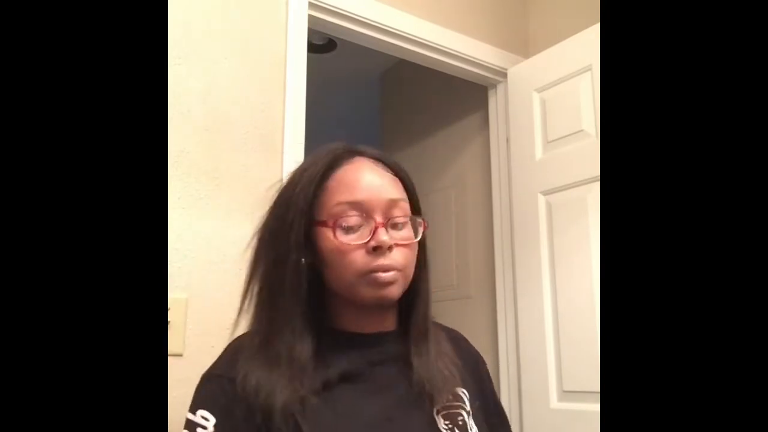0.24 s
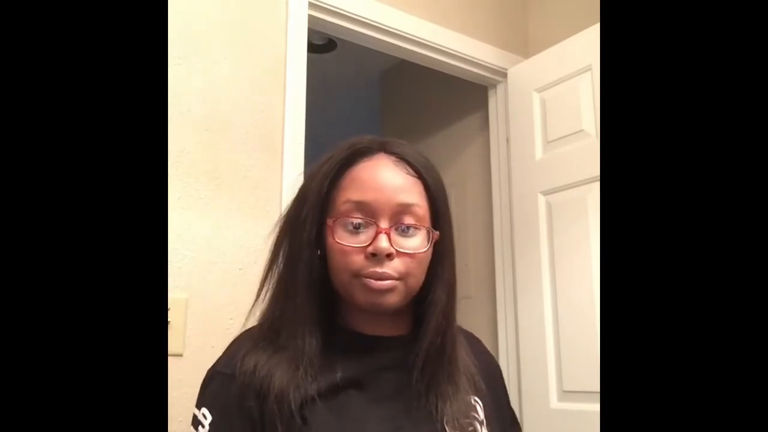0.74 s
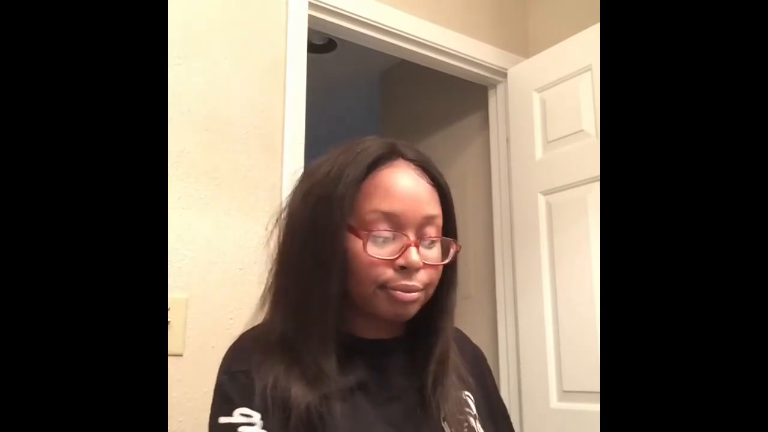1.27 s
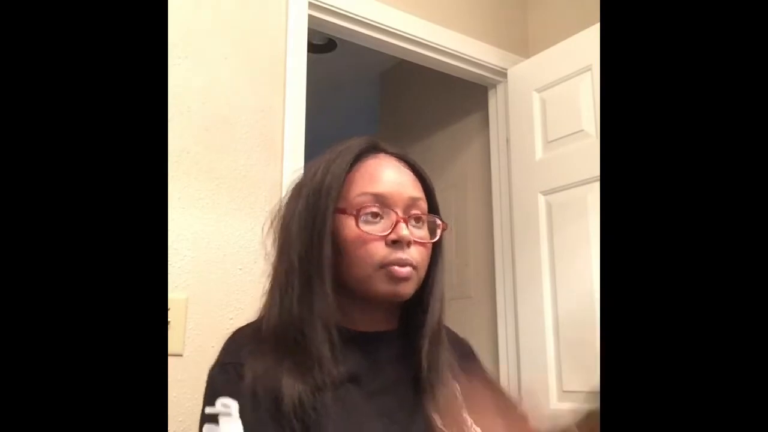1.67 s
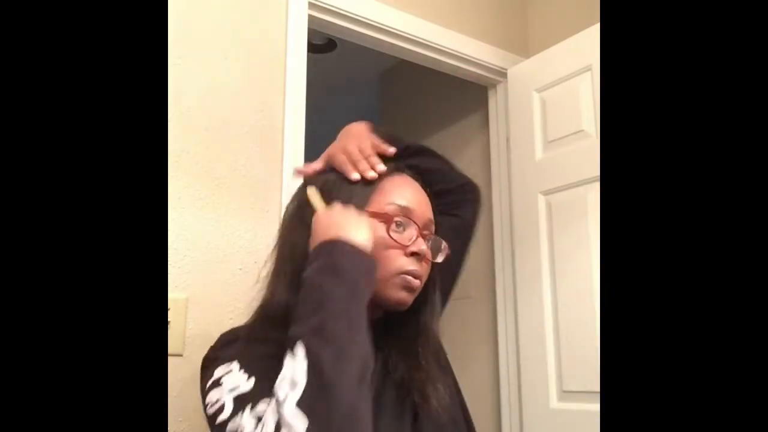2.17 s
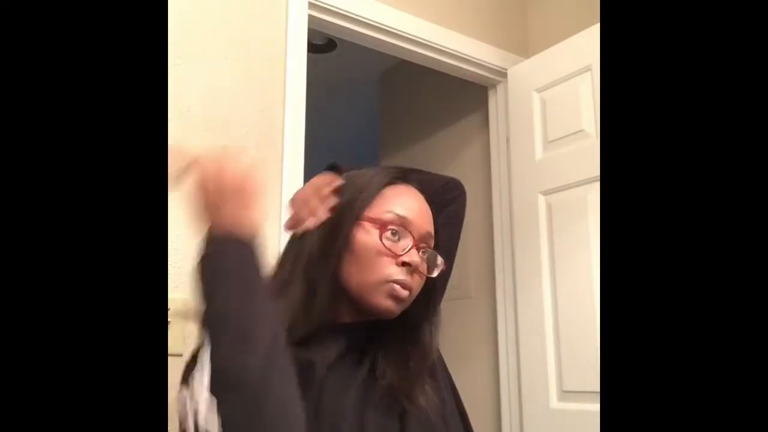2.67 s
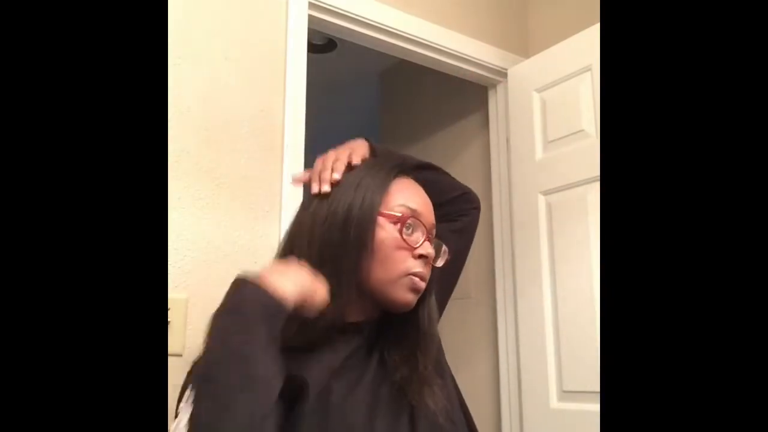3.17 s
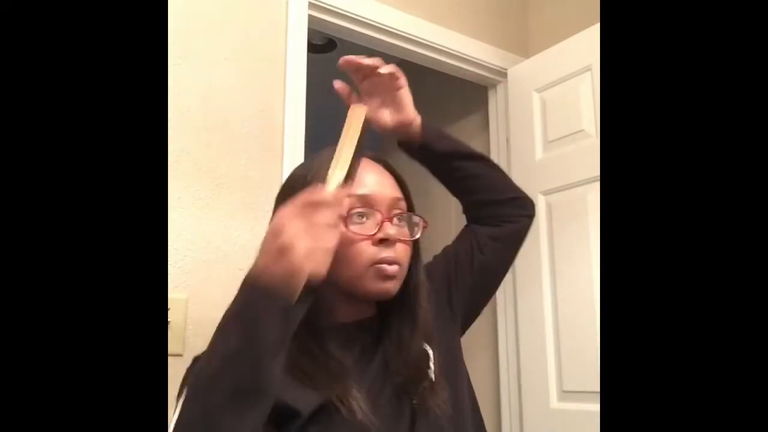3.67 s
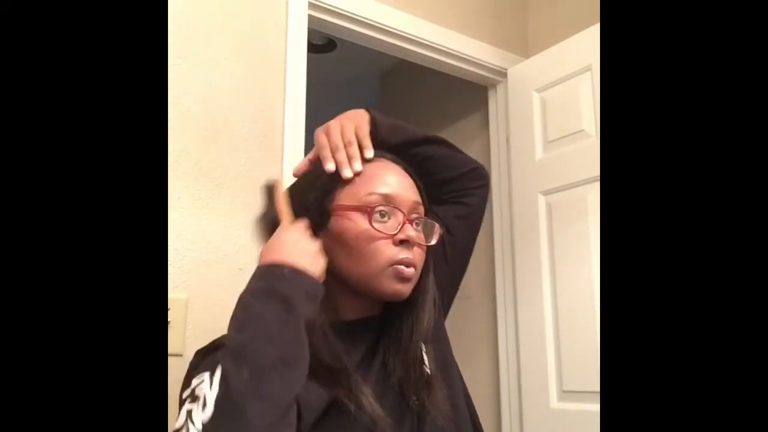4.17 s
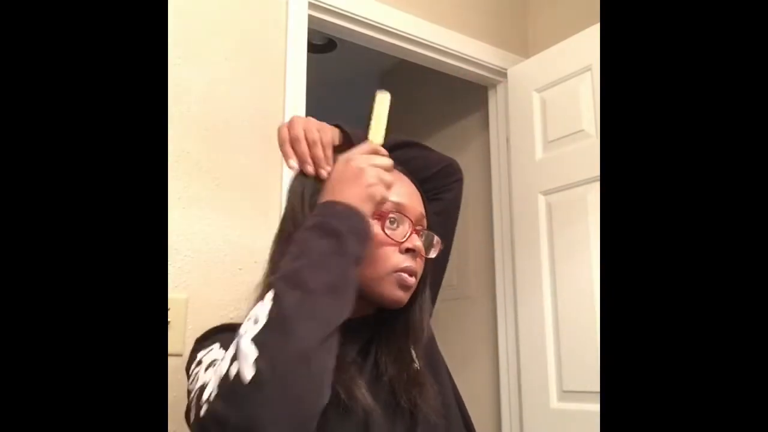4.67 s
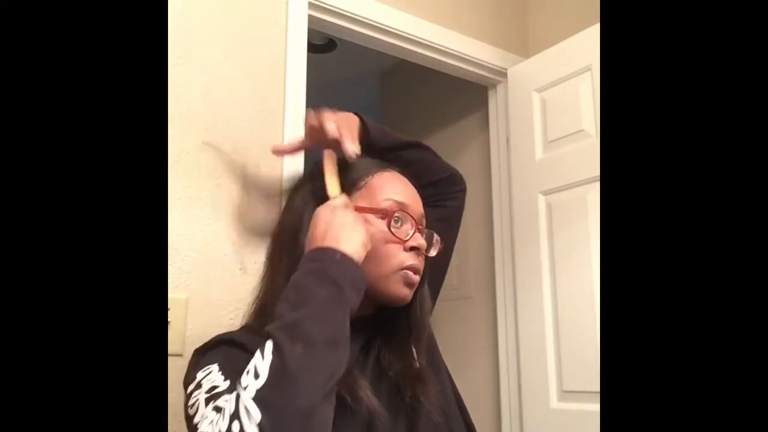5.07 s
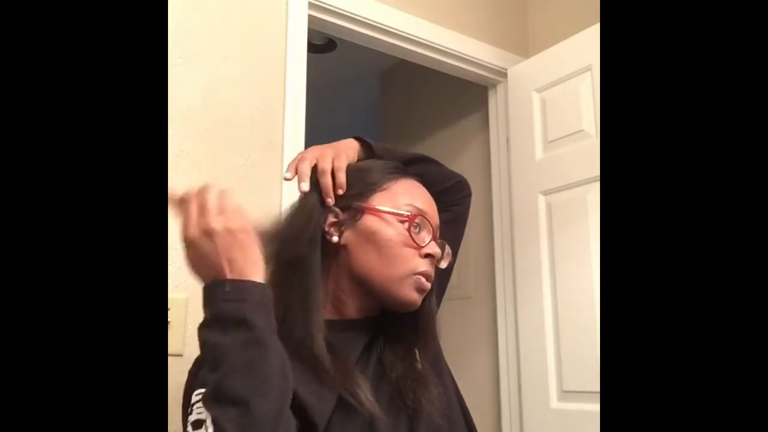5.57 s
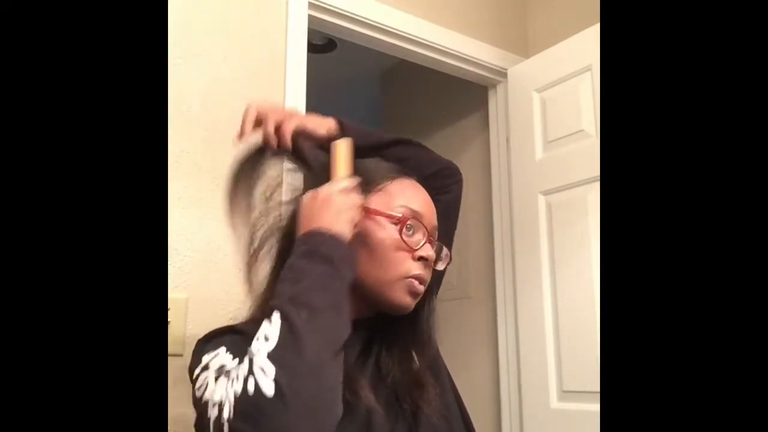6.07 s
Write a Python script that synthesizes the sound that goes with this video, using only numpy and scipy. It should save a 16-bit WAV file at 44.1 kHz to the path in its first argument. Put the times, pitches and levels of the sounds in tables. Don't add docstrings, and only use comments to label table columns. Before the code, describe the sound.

Light plastic clicks and one boomy double knock on a bathroom counter give way to quiet, airy comb strokes, with a vent fan humming.

```python
import sys
import numpy as np
from scipy import signal
from scipy.fft import rfft, irfft
from scipy.io import wavfile
from scipy.ndimage import uniform_filter1d

SR = 44100
rng = np.random.default_rng(int(sys.argv[2]) if len(sys.argv) > 2 else 0)


def natural_amplitude(level_db):
    exponent = np.asarray(level_db, float) / 20
    return 10 ** exponent


def pcm_store(signal):
    levels = np.round(np.clip(np.atleast_2d(signal), -1, 1) * 32767)
    wavfile.write(sys.argv[1], SR, levels.astype(np.int16).T)


N = 279223

# start in seconds, peak of body, edge and bristles in dB, contact time in seconds.
CLACKS = [(.002, -22, -21, -24.5, 0.0057), (0.1181, -34.5, -37.5, -51, 0.0078),
          (0.3052, -48, -37.5, -27.5, 0.003), (0.3834, -55, -59, -42, 0.003),
          (0.405, -55, -46, -58, 0.0019), (0.7412, -42.5, -42.5, -70, 0.0027),
          (0.7742, -43.5, -68, -61, 0.004), (0.9368, -40.5, -54, -68, 0.001),
          (0.9614, -64, -40, -39, 0.0018), (1.058, -42.5, -72, -64, 0.0011),
          (1.0968, -30.5, -28.5, -24, 0.0015), (1.1054, -65, -38, -19.5, 0.0017),
          (1.4287, -61, -78, -74, 0.0025), (1.4904, -35, -33.5, -38, 0.012)]
# frequency in Hz, level in dB, t60 in seconds.
PLASTIC_MODES = [(820, 6, 0.15), (1168, -25, 0.15), (1293, -9, 0.23), (1776, 3, 0.13), (2137, 1, 0.19),
                 (2720, 2, 0.06), (3590, -6, 0.93), (4400, 1, 0.24), (5324, -9.5, 0.19), (6600, -28, 0.28)]
# low edge in Hz, high edge in Hz.
CLACK_RANGES = [(900, 3000), (2700, 7200), (6500, 14500)]


def clacks(ring_db=-8, tick_db=7, wet_db=8):
    out = np.zeros(N)
    body = ring(PLASTIC_MODES, damp=0.14)
    t = np.arange(SR // 8) / SR
    noise = rng.standard_normal((len(CLACKS), len(t)))
    for (start_s, *peaks_db, contact_s), chatter in zip(CLACKS, noise):
        chatter = chatter * np.exp(-t / max(contact_s, 2e-4))
        hit = chatter / np.sqrt(np.sum(chatter ** 2)) + natural_amplitude(tick_db) * (t == 0)
        ringing = signal.fftconvolve(hit, body)[:len(t)]
        hit = unit(hit) + natural_amplitude(ring_db) * unit(ringing)
        clack = np.zeros(len(t))
        for peak_db, (lo_hz, hi_hz) in zip(peaks_db, CLACK_RANGES):
            part = band(band(hit, lo_hz, hi_hz), lo_hz, hi_hz)
            clack += natural_amplitude(peak_db) * part / np.abs(part).max()
        add(out, start_s, clack)
        add(out, start_s, natural_amplitude(wet_db) * room(clack))
    return out


# start in seconds, peak in dB, push time in seconds.
THUMPS = [(.003, -31, 0.00082), (0.12, -35, 0.0012), (0.691, -39, 0.002), (0.743, -41, 0.00078),
          (0.94, -25.5, 0.0021), (1.06, -26.5, 0.002), (1.102, -16, 0.0026), (1.109, -18, 0.00042),
          (1.1159, -14, 0.0015), (1.432, -33, 0.0027), (1.4921, -37, 0.00018)]
# frequency in Hz, level in dB, t60 in seconds.
COUNTER_MODES = [(100, -21, 0.33), (139, 0, 0.1), (182.5, 2.5, 0.11), (235.4, -9, 0.26), (307.5, -7, 0.27),
                 (382, -8, 0.11), (455, -16, 0.46), (549, -14, 0.21), (591, -17, 0.53), (708, -23, 0.42),
                 (833, -13, 0.19), (969, -38, 0.12)]


def thumps(low_hz=120):
    out = np.zeros(N)
    body = ring(COUNTER_MODES, damp=0.33)
    for start_s, peak_db, push_s in THUMPS:
        push = np.hanning(int(push_s * SR) + 3)
        boom = band(np.convolve(body, push), low_hz, 3000)
        add(out, start_s, natural_amplitude(peak_db) * boom / np.abs(boom).max())
    return out


# full contact in seconds, hold in seconds, level in dB,
# drift over the hold in dB, approach in dB/s.
SCRAPES = [
    (.505, 0.096, -65.5, 1, 498),
    (.66, 0.066, -76, 4, 202),
    (.96, 0.038, -59.5, -26, 503),
]
# full contact in seconds, hold in seconds, level in dB,
# drift over the hold in dB, approach in dB/s.
RUSTLES = [
    (.1, 0.24, -70, 0.5, 100),
    (.39, 0.064, -61, -9.5, 200),
    (.965, 0.18, -57, -20, 600),
    (1.25, 0.51, -74, -8, 100),
]


def slide(lift_db_s=243):
    back, bristles = grains(spread_db=1.5), grains(spread_db=2.2)
    scrape = natural_amplitude(1.5 * walk(57.4)) * unit(band(band(back, 810, 2940), 730, 3000))
    rustle = natural_amplitude(0.95 * walk(50)) * unit(band(band(bristles, 3400, 17000), 3900, 17000))
    return drags(SCRAPES, lift_db_s) * scrape + drags(RUSTLES, lift_db_s) * rustle


# full contact in seconds, hold in seconds, level in dB, drift
# over the hold in dB, approach in dB/s.
STROKES = [(1.75, 0.19, -75, 7.5, 200), (2.08, 0.14, -57, 0.5, 126), (2.3, 0.24, -63, -4.5, 200),
           (2.62, 0.26, -75, -2, 100), (2.975, 0.04, -50, 1, 900), (3.06, 0.092, -55.5, 6.5, 300),
           (3.22, 0.22, -66.5, -2.5, 300), (4.0, .36, -66.5, -6.5, 400), (4.89, .34, -64, 3, 332),
           (5.26, 0.26, -67, -9.5, 300), (6.135, .09, -61, -0.5, 200), (6.24, .1, -62.5, -4, 200)]
# frequency in Hz, density in dB per Hz.
STRAND_SPECTRUM = [(2350, -45), (4250, -25), (4700, -8.5), (5410, -9.5), (7840, -7), (12300, -1.5),
                   (15000, -1.5), (16000, -16)]
# frequency in Hz, density in dB per Hz.
TOOTH_SPECTRUM = [(1200, -13), (2800, -13), (3500, -5.5), (4500, -6.5), (6500, -4.5), (9000, -3),
                  (14000, -24)]
# start in seconds, peak in dB, centre frequency in Hz.
SNAGS = [
    (1.999, -58, 3460),
    (2.1798, -51, 5240),
    (2.2937, -54, 4500),
    (2.298, -51, 8600),
    (3.339, -58.5, 4200),
    (3.9983, -51, 8610),
    (4.1679, -59, 5530),
    (5.1994, -55, 5170),
]


def comb(snag_s=.006, lift_db_s=240, firm_db=-57, rasp_db=-8, rasp_power=1.23):
    hiss = natural_amplitude(1.1 * walk(40)) * unit(colour(grains(spread_db=2.0), shape(STRAND_SPECTRUM)))
    rasp = unit(colour(grains(spread_db=-3.5), shape(TOOTH_SPECTRUM)))
    rasp = natural_amplitude(rasp_db + 0.86 * walk(30)) * rasp
    pull = drags(STROKES, lift_db_s) / natural_amplitude(firm_db)
    out = natural_amplitude(firm_db) * (pull * hiss + pull ** rasp_power * rasp)
    t = np.arange(SR // 20) / SR
    noise = rng.standard_normal((len(SNAGS), len(t)))
    for (start_s, peak_db, hz), burst in zip(SNAGS, noise):
        snag = band(burst * np.exp(-t / snag_s), .82 * hz, 1.22 * hz)
        add(out, start_s, natural_amplitude(peak_db) * snag / np.abs(snag).max())
    return out


# frequency in Hz, density in dB per Hz.
AIR_SPECTRUM = [(15, -45), (25, -23), (108, -1), (245, -4), (275, -15.5), (600, -29.5), (2160, -40),
                (16000, -49.5)]
# frequency in Hz, width in Hz, gain in dB.
AIR_BUMPS = [(61, 9.2, 1.5), (91.5, 7.5, 3.5), (116.5, 2.67, 2), (127.6, 4.8, 8), (175, 8.8, 6.5),
             (200, 6.9, 4), (224.3, 5.3, 1.5), (300, 9, 5.5), (365.5, 22, 7.5), (400, 11, -5.5),
             (444, 18, 5.5), (474, 26, -4), (823, 20, 6), (1050, 136, 3.5)]
# frequency in Hz, level in dB rms.
WHINE = [(360, -70), (960, -88.5), (1042, -86.5), (1165, -87)]


def fan(air_db=-47.5):
    def air_gain(f):
        boom_db = sum(db / (1 + ((f - hz) / width_hz) ** 2) for hz, width_hz, db in AIR_BUMPS)
        return shape(AIR_SPECTRUM)(f) * natural_amplitude(boom_db)

    out = natural_amplitude(air_db + .5 * walk(1.9)) * unit(colour(rng.standard_normal(N), air_gain))
    t = np.arange(N) / SR
    for hz, rms_db in WHINE:
        level = natural_amplitude(rms_db + 1.9 * walk(4)) * np.sqrt(2)
        out = out + level * np.sin(2 * np.pi * hz * t + 0.97 * walk(4.2))
    return out


def room(x):
    return signal.fftconvolve(x, tail())[:N]


# frequency in Hz, t60 in seconds.
ROOM_DECAY = [(150, 0.51), (600, 0.42), (2000, 0.26), (5000, .25), (12000, 0.16)]


def tail(build_s=0.0015):
    t, out = np.arange(SR // 2) / SR, 0
    hz, t60_s = np.transpose(ROOM_DECAY)
    noise = rng.standard_normal(len(t))
    for f in 60 * 2 ** np.arange(0, 8.1, .5):
        decay = np.exp(-np.log(1000) * t / np.interp(np.log(f), np.log(hz), t60_s))
        out = out + band(noise, f / 1.19, f * 1.19) * decay
    out = out * (1 - np.exp(-t / build_s))
    return out / np.sqrt(np.sum(out ** 2))


def drags(table, lift_db_s):
    t, power = np.arange(N) / SR, 0
    for start_s, hold_s, db, drift_db, approach_db_s in table:
        held_db = db + drift_db * np.clip((t - start_s) / hold_s, 0, 1)
        approach_db = approach_db_s * np.maximum(start_s - t, 0)
        lift_db = lift_db_s * np.maximum(t - start_s - hold_s, 0)
        power = power + natural_amplitude(held_db - approach_db - lift_db) ** 2
    return np.sqrt(power)


def grains(spread_db):
    return rng.standard_normal(N) * natural_amplitude(spread_db * rng.exponential(size=N))


def ring(modes, damp):
    t, out = np.arange(SR // 2) / SR, 0
    for hz, db, t60_s in modes:
        decay = np.exp(-np.log(1000) * t / (damp * min(t60_s, .6)))
        out = out + natural_amplitude(db) * np.sin(2 * np.pi * hz * t) * decay
    return out / np.abs(out).max()


def walk(rate_hz):
    k = int(SR / rate_hz)
    steps = np.repeat(rng.standard_normal(N // k + 1), k)
    return 1.57 * uniform_filter1d(uniform_filter1d(steps, k), k)[:N]


def colour(x, gain):
    hz = np.arange(len(x) // 2 + 1) * SR / len(x)
    return irfft(rfft(x) * gain(np.maximum(hz, 1)), len(x))


def shape(points):
    hz, db = np.transpose(points)
    return lambda f: natural_amplitude(np.interp(np.log(f), np.log(hz), db))


def band(x, lo_hz, hi_hz):
    sos = signal.butter(2, [lo_hz, min(hi_hz, .45 * SR)], "band", fs=SR, output="sos")
    return signal.sosfilt(sos, x)


def unit(x):
    return x / np.sqrt(np.mean(x ** 2))


def add(out, start_s, x):
    i = int(start_s * SR)
    out[i:i + len(x)] += x[:N - i]


def scene():
    drag, low, hair = slide(), thumps(), comb()
    wet = room(drag + natural_amplitude(-4) * low + natural_amplitude(-10) * hair)
    return (clacks() + drag + low + hair + wet + fan())[None]


def low_pass(x):
    return signal.sosfilt(signal.butter(12, 15810, fs=SR, output="sos"), x)


def record(dry):
    return low_pass(dry)


dry = scene()
out = record(dry)
pcm_store(out)
```